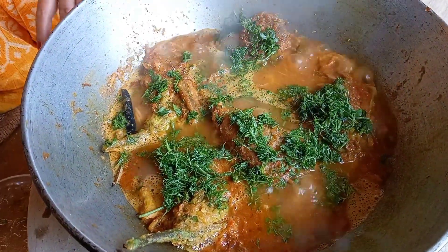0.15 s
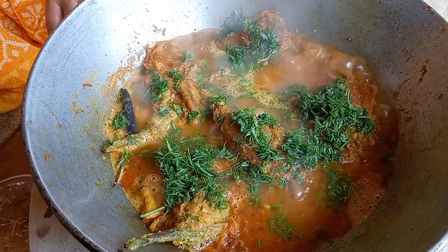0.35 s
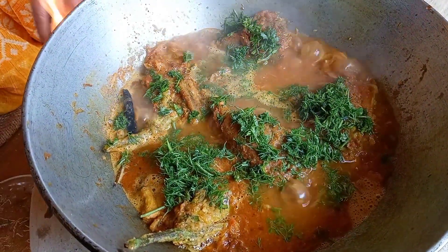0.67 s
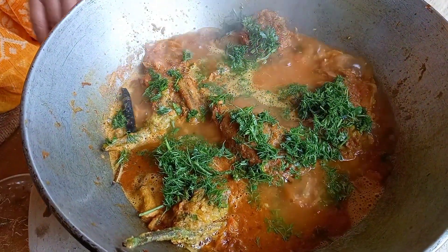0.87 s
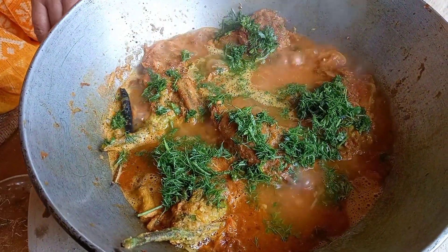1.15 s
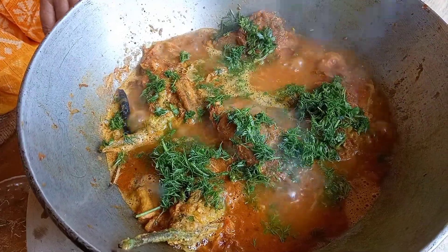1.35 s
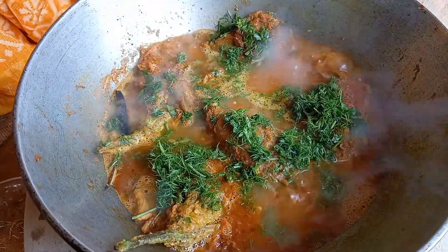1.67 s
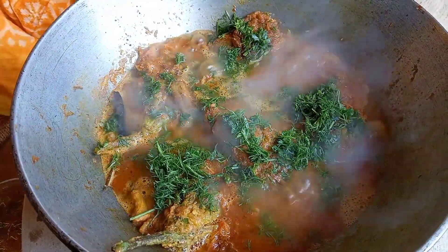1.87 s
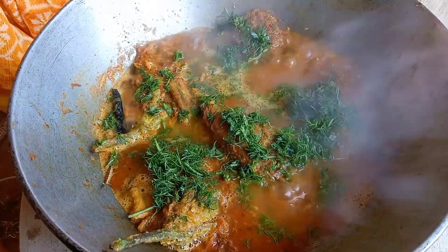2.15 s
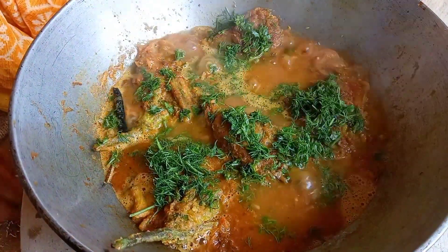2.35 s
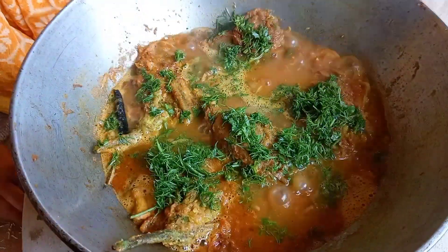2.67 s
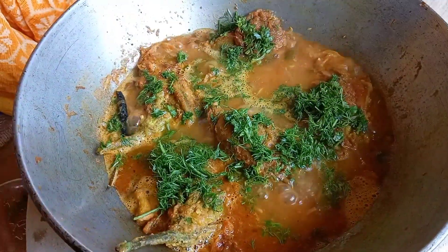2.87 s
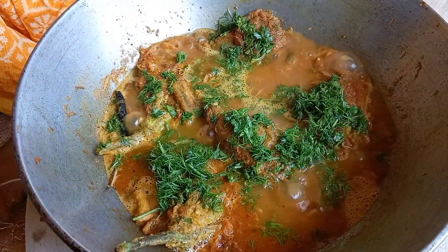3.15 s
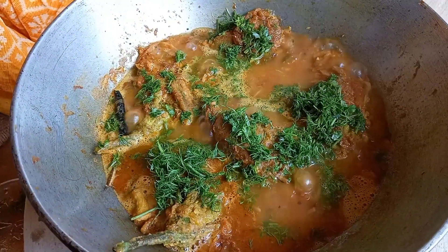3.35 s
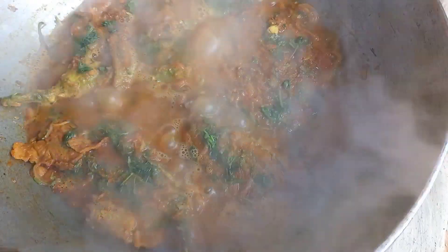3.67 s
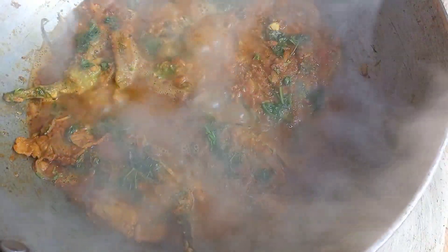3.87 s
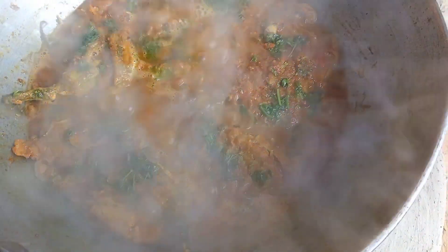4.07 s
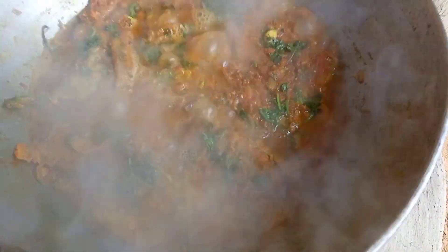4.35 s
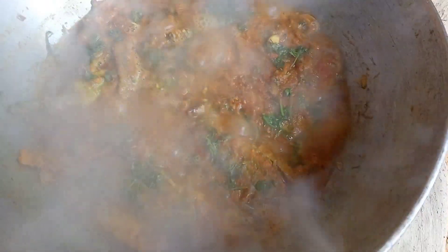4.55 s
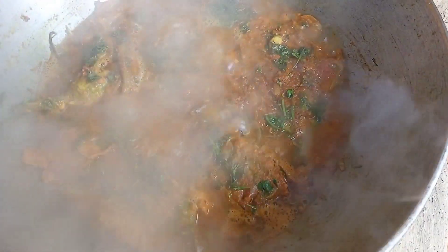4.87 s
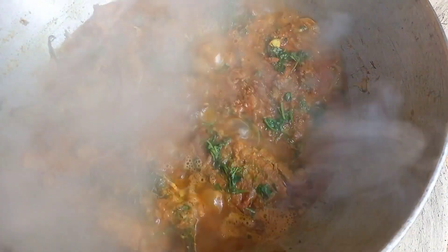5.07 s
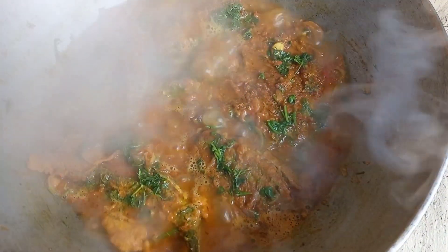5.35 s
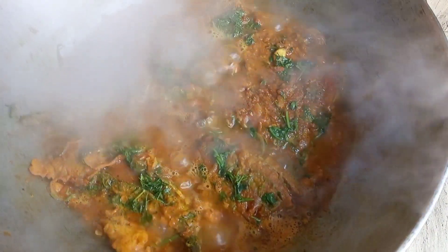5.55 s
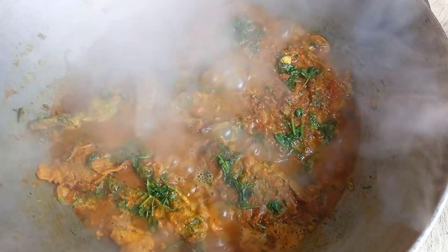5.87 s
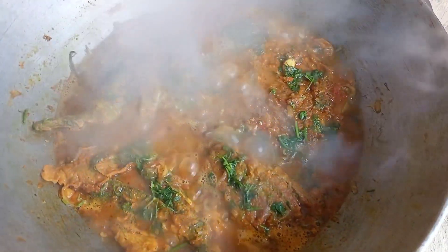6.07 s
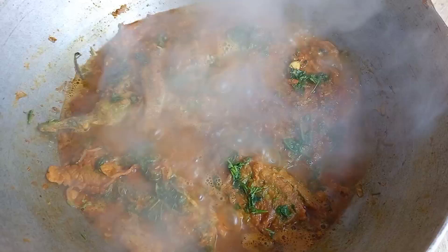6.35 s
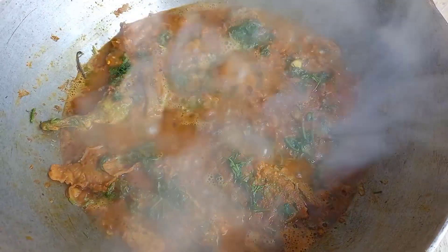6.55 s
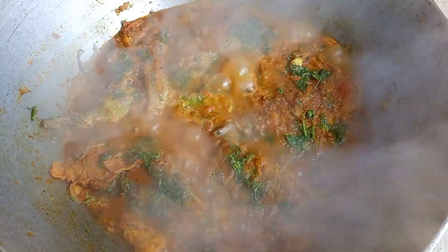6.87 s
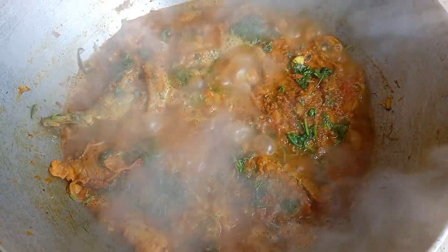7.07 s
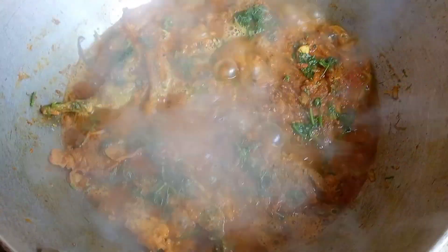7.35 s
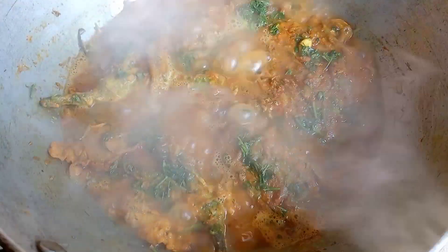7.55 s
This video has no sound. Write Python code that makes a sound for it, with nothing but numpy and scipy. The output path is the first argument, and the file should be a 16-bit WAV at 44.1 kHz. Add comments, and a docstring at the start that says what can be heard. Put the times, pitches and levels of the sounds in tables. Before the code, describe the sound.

Close over an open metal wok in an outdoor yard, thick sauce simmers from 0 seconds: irregular clusters of small wet bubbles, with larger short, hollow, ringing pops, notably at 0.16, 1.4 and 1.7. Sharp spits click around 0.4 and 1.4-1.5. Small birds whistle in gliding, fluttering, sometimes buzzy notes, with a falling call near 2.0, and become loud and busy from 2.9 to 3.7. Faint dull thumps come near 2.05, 2.3 and 3.05; a very loud one hits at 2.74. At 3.76 the scene cuts hard to a stronger boil, denser and lower, with steady plopping and frequent crackling spits. Faint sizzles flare at 4.6, 6.3 and 7.5; softer thumps fall at 5.4 and 6.1. Birds are sparse, returning around 5.5, 6.1, 6.8 and 7.35. Strong pops sound at 7.2 and 7.6. A low, uneven airy roar and faint hiss run throughout.

```python
"""Two scenes of curry in an open wok outdoors: it simmers, then after a hard cut at 3.76 s it boils.
Steam bubbles burst as short ringing pops, in clusters; sauce spits and hisses on the hot metal.
A few dull thumps are low tones that drop in pitch, and one of them is very loud.
Small birds whistle and buzz in gliding, fluttering tones, thrown back by the walls of a yard.
Coloured noise makes a low roar with a faint hiss behind it all."""
import sys
import numpy as np
from scipy import signal
from scipy.fft import rfft, irfft
from scipy.io import wavfile
from scipy.ndimage import uniform_filter1d

SR = 44100
rng = np.random.default_rng(int(sys.argv[2]) if len(sys.argv) > 2 else 0)


def file_out(sig):
    """Save sig as 16-bit WAV at sys.argv[1]."""
    # one column per channel
    cols = np.atleast_2d(sig).T
    # limit, then scale
    lim = np.clip(cols, -1, 1)
    pcm = np.round(lim * 32767).astype(np.int16)
    wavfile.write(sys.argv[1], SR, pcm)


N = 340011  # length in samples
CUT_S = 3.76  # the simmering scene ends and the boiling scene begins

# the largest bubbles: start_s, level_db (before the wok colours them), pitch_hz (at the start)
POPS = [(0.051, -22, 1390), (0.162, -12.5, 1450), (0.172, -21, 1870), (0.298, -24, 1100), (0.437, -23, 866),
        (0.48, -17, 1470), (0.576, -20, 2000), (1.048, -24, 1110), (1.359, -16, 1820), (1.539, -17, 2530),
        (1.666, -14.5, 1520), (1.936, -18, 1990), (2.286, -18, 1340), (2.723, -18, 1080),
        (2.775, -19.5, 2340), (2.851, -24, 1060), (2.887, -20.5, 1960), (3.141, -17, 1360),
        (3.211, -21.5, 2300), (3.435, -17, 1580), (3.605, -15, 1560), (3.681, -20.5, 1850),
        (3.842, -23, 1510), (3.889, -19, 2160), (3.902, -17, 1400), (4.055, -15, 2420), (4.113, -20, 1450),
        (4.18, -18.5, 1020), (4.244, -21.5, 940), (4.374, -17, 706), (4.409, -19, 1070), (4.425, -18, 1400),
        (4.526, -20.5, 800), (4.67, -20.5, 1740), (4.803, -16.5, 1550), (4.918, -17.5, 1100),
        (5.079, -22, 1560), (5.178, -16.5, 1160), (5.216, -18, 1620), (5.325, -19, 1830),
        (5.446, -18, 1110), (5.464, -16.5, 2070), (5.512, -16.5, 710), (5.542, -17.5, 610),
        (5.688, -17.5, 756), (5.713, -17, 1590), (5.782, -16, 1310), (5.876, -16.5, 1170),
        (5.914, -16.5, 1720), (5.983, -20, 970), (6.071, -19, 990), (6.242, -18.5, 910), (6.249, -19, 636),
        (6.454, -15, 1500), (6.469, -18.5, 576), (6.56, -21, 1020), (6.629, -19.5, 980), (6.723, -20, 900),
        (6.774, -18.5, 940), (6.971, -19.5, 940), (7.226, -10.5, 1450), (7.335, -18, 2220),
        (7.444, -20, 556), (7.593, -12.5, 1700)]
# Three bird calls that come back, one note per row: start_s (within the call), length_s,
# first_pitch_hz, last_pitch_hz, arch_hz (bulge of the glide), level_db (within the call),
# buzz_hz (strength of the pitch shaking)
FALL = [(0, .075, 5330, 5140, 30, -13, 45), (.06, .07, 5045, 5040, -20, -11, 35),
        (.075, .13, 4450, 4000, 30, -0.5, 84.7), (.185, .075, 3950, 3510, -2, 0.5, 400),
        (.27, .065, 3430, 3430, 14.5, -1.5, 40), (.34, .07, 3424, 3297, 21, -2, 110)]
RISE = [(0, .1, 2947, 3355, 60, -3.5, 200), (.085, .07, 3440, 4014, 40, 0.5, 230),
        (.135, .08, 4064, 4160, 30, -1, 55)]
CHIRP = [(0, .085, 3900, 4330, 252, -0.5, 380), (.06, 0.11, 3950, 3870, -57.5, -2, 190),
         (.01, .13, 5200, 5250, 150, -11.5, 390)]


def gain_of(db):
    """Turns decibels into a gain."""
    return 10 ** (np.asarray(db) / 20)


def evened(x):
    """Scales a sound to an average strength (rms) of 1."""
    return x / np.sqrt(np.mean(x ** 2) + 1e-20)


def add(mix, s, sound):
    """Mixes a sound in at s seconds, cutting off what runs past the end."""
    part = mix[max(0, round(s * SR)):][:len(sound)]
    part += sound[:len(part)]


def wander(size, rate_hz):
    """Smooth random drift of rms 1, made of noise with its changes faster than rate_hz weakened."""
    hz = np.fft.rfftfreq(size, 1 / SR)
    spectrum = rfft(rng.standard_normal(size))
    return evened(irfft(spectrum / (1 + (hz / rate_hz) ** 4), size))


def colour(x, points, size=4096):
    """Filters to the given spectrum without sounding ahead of time, so that clicks stay sharp."""
    f, db = np.transpose(points)
    hz = abs(np.fft.fftfreq(size, 1 / SR))
    log_gain = np.log(gain_of(np.interp(np.log(hz + 1), np.log(f), db)))
    # the Hilbert transform gives the phase that puts the energy earliest
    taps = np.fft.ifft(np.exp(np.conj(signal.hilbert(log_gain)))).real
    return signal.oaconvolve(x, taps[:size // 2])[:len(x)]


def echoes(x, first, t60, count):
    """Scattered reflections from first s on, losing 60 dB in t60 s; their total energy is 1."""
    delay = rng.uniform(0, t60, count)
    taps = np.zeros(int((first + t60) * SR) + 2)
    strength = rng.choice([-1, 1], count) * gain_of(-60 * delay / t60)
    np.add.at(taps, ((first + delay) * SR).astype(int), strength)
    return signal.oaconvolve(x, taps / np.linalg.norm(taps))[:len(x)]


def pop(hz, cycles, rise, size=900):
    """A bursting bubble: its cavity rings for a few cycles and rises in pitch as the hole widens."""
    turns = hz * np.arange(size) / SR
    age = turns / cycles
    opening = 1 - np.exp(-turns / .35)
    rising_turns = turns * (1 + rise * age / (1 + age))
    ring = opening * np.exp(-age) * np.sin(2 * np.pi * rising_turns)
    return ring / abs(ring).max()


def small_bubbles(per_s=1200, spread_db=4.0, cluster_db=2.0, size_cluster_db=0.65, cluster_hz=45,
                  simmer_db=-0.5, boil_db=0.0, count=32):
    """Bubbles burst in clusters, those of like size together; the wok colours them."""
    # colour of the small bubbles in the simmering scene: frequency_hz, level_db (per Hz, relative)
    simmer = [(60, -24.5), (200, -10), (420, 5.5), (750, 0.5), (1050, 2), (1330, -3.5), (1620, 1),
              (2300, 0), (3200, -1.5), (4800, -13.5), (6500, -34.5), (8500, -54.5), (11500, -42),
              (15000, -45.5)]
    # the same in the boiling scene: frequency_hz, level_db (per Hz, relative)
    boil = [(60, -12.5), (200, -8), (450, 2.5), (1050, 0), (1330, -9), (1650, -3), (2300, -4),
            (3100, -14.5), (4900, -16), (6500, -30.5), (8800, -56), (11500, -42), (13000, -48.5),
            (15500, -39)]
    t = np.arange(N) / SR
    foam = np.zeros(N)
    # four families of neighbouring pitches, each with its own activity
    for family in np.split(np.geomspace(200, 12000, count), 4):
        activity = gain_of(size_cluster_db * np.clip(wander(N, cluster_hz), -2, 2))
        for hz in family:
            at = rng.integers(0, N, int(per_s * N / SR / count))
            bursts = np.zeros(N)
            bursts[at] = gain_of(spread_db * np.minimum(rng.exponential(1, len(at)), 4))
            # middle-sized bubbles ring longest; big ones are damped by the thick sauce
            cycles = rng.uniform(.5, 1.3) * (1 + 1.8 * np.exp(-2 * np.log(hz / 1700) ** 2))
            ring = pop(hz, cycles, rise=0.053)
            ring /= np.linalg.norm(ring)
            foam += signal.oaconvolve(bursts * activity, ring)[:N] * np.sqrt(hz)
    foam *= gain_of(cluster_db * np.clip(wander(N, cluster_hz), -2, 2))
    foam += 0.36 * echoes(foam, first=0.001193, t60=.03, count=40)
    out = np.zeros(N)
    simmering = t < CUT_S
    for points, db, when in ((simmer, simmer_db, simmering), (boil, boil_db, ~simmering)):
        sound = colour(foam, points)
        # steam escapes at an even pace, so clusters share out a steady power
        power = abs(uniform_filter1d(sound ** 2, size=3500))
        sound /= np.sqrt(power + 1e-12)
        out += sound * gain_of(db) * when
    return out * steam(t)


def steam(t, stir_db=-19.5, stir_half_length_s=.02):
    """Gain of the small bubbles: steady heat, a swell for each gulp, a brief one round each large pop."""
    # how hard the sauce bubbles between gulps: time_s, level_db (relative)
    heat = [(0, -42), (1.3, -42.5), (2.5, -40), (3.7, -42.5), (3.82, -38.5), (4.0, -43), (4.2, -41),
            (5.2, -42), (6.0, -40), (7.7, -40.5)]
    # gulps of steam that set off small bubbles: middle_s, half_length_s, level_db (relative)
    gulps = [(0.014, 0.09, -35), (0.167, .025, -33), (0.293, 0.033, -33), (.407, .02, -34.5),
             (.435, .015, -33), (0.496, .03, -35), (0.566, 0.039, -36), (.73, 0.075, -35),
             (0.868, 0.084, -39), (.95, .04, -35.5), (1.041, 0.033, -30.5), (1.149, 0.044, -37),
             (1.26, 0.035, -35.5), (1.375, .03, -29.5), (1.543, 0.044, -35), (1.66, 0.033, -35.5),
             (2.453, 0.055, -37.5), (2.731, 0.018, -29.5), (3.2, 0.073, -36.5), (3.316, 0.021, -30.5),
             (3.467, .06, -35.5), (3.611, .02, -34), (3.903, .025, -36.5), (4.085, 0.06, -33.5),
             (4.265, .035, -36.5), (4.33, 0.06, -36), (4.425, 0.055, -35.5), (4.544, .035, -34),
             (4.665, 0.11, -38.5), (4.853, 0.065, -37), (5.047, 0.052, -37.5), (5.145, .04, -37),
             (5.331, 0.031, -32), (5.455, 0.022, -34.5), (5.516, 0.019, -33), (5.692, 0.046, -34),
             (6.008, 0.044, -38), (6.241, .025, -30.5), (6.338, 0.063, -36.5), (6.422, 0.021, -36.5),
             (6.483, 0.041, -32), (6.614, .04, -33), (6.762, 0.02, -35.5), (6.958, 0.052, -34),
             (7.09, 0.13, -38), (7.236, 0.018, -31), (7.384, 0.03, -38), (7.45, 0.031, -33.5),
             (7.582, 0.047, -34), (7.647, 0.026, -32)]
    power = gain_of(np.interp(t, *np.transpose(heat))) ** 2
    stirs = [(s, stir_half_length_s, db + stir_db) for s, db, hz in POPS]
    for middle, half_length, db in gulps + stirs:
        swell = signal.windows.hann(int(2 * half_length * SR)) ** 2
        start = middle - half_length
        # a swell that begins before time 0 loses its first part
        add(power, start, gain_of(db) ** 2 * swell[max(0, round(-start * SR)):])
    return np.sqrt(power)


def large_bubbles(level_db=-1.0, splash=0.19, neighbour_db=-12, neighbour_s=.009, count=3):
    """Each large pop sets off a few smaller neighbours; the steep metal sides scatter and colour them."""
    # how the hollow of the wok colours a large pop: frequency_hz, gain_db
    wok = [(100, -2), (350, 3), (550, -5.5), (1050, -1.5), (1350, -12.5), (1650, -1), (2300, -0.5),
           (3200, -1), (5000, -8), (7000, -23), (10000, -31.5)]
    out = np.zeros(N)
    for s, db, hz in POPS + middling_pops():
        cycles = rng.uniform(.7, 1.1) * (.5 + hz / 1400)
        ring = pop(hz, cycles, rise=0.042)
        scattered = splash * echoes(ring, first=0.000932, t60=.025, count=14)
        add(out, s, gain_of(db + level_db) * (ring + scattered))
        for when, size, pitch in rng.standard_normal((count, 3)):
            near_hz = np.clip(hz * np.exp(.4 * pitch), 350, 2600)
            blip = pop(near_hz, cycles=.5 + near_hz / 1100, rise=0.054)
            add(out, s + neighbour_s * abs(when), gain_of(db + neighbour_db + 1.2 * size) * blip)
    return colour(out, wok)


def middling_pops(per_s=9, typical_db=-25, typical_hz=947, spread_db=2.0, pitch_spread=0.34, count=200):
    """Rows like those of POPS for middling bubbles, falling at random through the boiling scene."""
    times = CUT_S + np.cumsum(rng.exponential(1 / per_s, count))
    sizes, pitches = np.clip(rng.standard_normal((2, count)), -2, 2)
    levels = typical_db + spread_db * sizes
    rows = zip(times, levels, typical_hz * np.exp(pitch_spread * pitches))
    return [row for row in rows if row[0] < N / SR]


def spits(spray=0.094, spray_s=0.0031, size=2048):
    """A film of sauce snaps, then fine spray crackles on the metal."""
    # sharp spits of sauce: start_s, level_db (peak), lift_db (of the fizz above 6 kHz)
    spit_list = [(0.41, -21, 0), (0.4306, -17, -17), (1.36, -20, -11), (1.5486, -17.5, -1),
                 (2.8542, -18, -5), (4.0536, -19.5, -11), (4.112, -18, -25), (4.263, -21, -2),
                 (4.525, -21, 9), (4.564, -20, 9), (4.662, -21, 14), (4.903, -31, 23), (5.178, -20, 3),
                 (5.465, -27, 6), (5.513, -14.5, 0), (5.8454, -19.5, 15), (6.023, -30, 18),
                 (6.412, -24.5, 7), (6.454, -18, 5), (6.6474, -17.5, 13.5), (6.759, -19, -7),
                 (6.773, -16.5, -4), (7.298, -19.5, 0), (7.5905, -14, -19)]
    # colour of a spit's snap: frequency_hz, level_db (per Hz, relative)
    snap_colour = [(100, -1), (500, 1.5), (2200, -1), (4200, 6), (5300, 0), (6500, -18.5), (8500, -40.5),
                   (11500, -35.5), (15000, -63)]
    out, t = np.zeros(N), np.arange(size) / SR
    for s, db, lift_db in spit_list:
        snap = spray * rng.standard_normal(size) * np.exp(-t / spray_s)
        snap[0] = 1  # the snap itself is a single click
        points = [(hz, level + lift_db * (hz > 6000)) for hz, level in snap_colour]
        sound = colour(snap, points)
        add(out, s, gain_of(db) * sound / abs(sound).max())
    return out


def sizzles(centre_hz=6400, width_hz=1700, crackle_db=4):
    """Sauce slops onto the hot dry side of the wok and hisses away, as crackling noise in a band."""
    # sauce hissing on the hot side: start_s, length_s, level_db (before the band filter)
    sizzle_list = [(4.593, 0.15, -48), (6.27, 0.16, -48), (7.54, 0.18, -49)]
    out = np.zeros(N)
    for s, length, db in sizzle_list:
        t = np.arange(int(length * SR)) / SR
        crackle = gain_of(crackle_db * wander(len(t), 400))
        hiss = evened(rng.standard_normal(len(t)) * crackle)
        swell = np.sin(np.pi * np.sqrt(t / length)) ** 2  # rises fast, fades slowly
        add(out, s, gain_of(db) * hiss * swell)
    band = [centre_hz - width_hz / 2, centre_hz + width_hz / 2]
    return signal.sosfilt(signal.butter(3, band, "band", fs=SR, output="sos"), out)


def thumps(sweep=2.6, sweep_s=0.0023, decay_s=0.0065, rise_s=0.00082, size=3500):
    """A low blow whose pitch drops at once and dies in a few cycles."""
    # dull thumps: start_s, level_db (before the rise and decay), pitch_hz (after the drop)
    thump_list = [(2.051, -29.5, 69), (2.31, -28, 85), (2.7364, 2.1, 107), (3.05, -27.5, 77),
                  (5.382, -18.5, 111), (6.13, -25, 128)]
    out, t = np.zeros(N), np.arange(size) / SR
    for s, db, hz in thump_list:
        turns = np.cumsum(hz * (1 + sweep * np.exp(-t / sweep_s))) / SR
        envelope = (1 - np.exp(-t / rise_s)) * np.exp(-t / decay_s)
        add(out, s, gain_of(db) * envelope * np.sin(2 * np.pi * turns))
    return out


def birds(level_db=-2.5, near_db=-8, yard_db=-10.0):
    """All bird notes, with quick reflections from near walls and the longer ring of the yard."""
    # when the returning calls are sung: call, start_s, level_db (relative)
    figures = [(CHIRP, 1.165, -34), (FALL, 1.968, -26), (RISE, 2.53, -26.5), (CHIRP, 6.128, -35),
               (FALL, 6.815, -28), (RISE, 7.352, -29.5)]
    # notes sung only once: start_s, length_s, first_pitch_hz, last_pitch_hz, arch_hz,
    # level_db (relative), buzz_hz
    single_notes = [(0, 0.097, 2330, 2620, 43.5, -38, 60), (.11, 0.048, 4450, 4630, 42, -45.5, 100),
                    (.15, 0.12, 2730, 2910, -2, -42, 100), (.225, 0.077, 3070, 4100, 80, -31.5, 190),
                    (.29, 0.11, 4200, 5430, 151, -48.5, 280), (.42, 0.41, 3720, 3280, -30, -37.5, 446.5),
                    (0.759, 0.073, 2970, 2950, -1, -37, 179.6), (0.871, 0.067, 3660, 3350, 0, -33.5, 160.7),
                    (0.909, 0.24, 2882, 2750, -130, -39.5, 130), (.94, 0.12, 4520, 5240, 99, -52, 140),
                    (1.07, .06, 4530, 5470, 100, -54, 120), (1.415, .06, 3190, 2860, 0, -40, 80),
                    (1.51, 0.098, 2810, 3460, 2, -37.5, 160), (1.59, .21, 3420, 3156, -0.5, -32.5, 210),
                    (1.841, 0.092, 5070, 4100, 243, -44.5, 40), (1.905, .095, 4350, 2850, -150, -33.5, 40),
                    (2.23, 0.15, 4900, 4770, -2, -41.5, 300), (2.35, .09, 3150, 3310, -49.5, -33, 450),
                    (2.43, .13, 3306, 3045, -100, -33, 721), (2.715, 0.091, 2266, 2600, 43, -34, 60),
                    (2.73, 0.084, 4050, 4080, 0, -34, 40), (2.825, 0.07, 4270, 2880, 0, -35, 350),
                    (2.88, 0.093, 3786, 3874, 21, -29.5, 35), (2.895, .08, 4860, 4790, -41, -29.5, 45.1),
                    (2.96, 0.13, 3480, 3820, 45, -32, 250), (2.97, 0.2, 4950, 4550, -100, -41, 240),
                    (3.05, 0.074, 3836, 3960, -1, -24.5, 110), (3.145, 0.078, 4480, 4120, 67, -30.5, 149),
                    (3.19, 0.093, 3587, 3145, -100, -24.5, 800), (3.28, 0.092, 3210, 3400, 2, -35, 850),
                    (3.35, 0.035, 3865, 3904, 1, -26.5, 80), (3.37, .05, 3045, 3205, 1, -30, 350),
                    (3.38, .1, 4860, 5530, 0, -42, 170), (3.4, 0.0776, 3244, 3428, 39, -20.5, 110),
                    (3.47, 0.14, 5750, 5720, 250, -55, 120), (3.59, .13, 4775, 4350, -120, -31.5, 150),
                    (3.59, 0.16, 5420, 4990, -2, -44, 432), (3.715, 0.048, 4260, 3450, -5, -29.5, 476),
                    (5.43, 0.06, 3840, 4090, 100, -39.5, 190), (5.505, 0.053, 4910, 5020, -30, -41, 60),
                    (5.513, 0.022, 3820, 3710, -1, -32, 30), (6.449, 0.087, 2710, 2480, -27, -43, 55)]
    song, out = np.zeros(N), np.zeros(N)
    for figure, start, db in figures:
        for s, *shape in figure:
            add(song, start + s, gain_of(db) * note(*shape))
    for s, *shape in single_notes:
        add(song, s, note(*shape))
    second_scene = np.arange(N) / SR >= CUT_S
    # each scene has its own echoes, and those of the first break off at the cut
    for when in (~second_scene, second_scene):
        near = gain_of(near_db) * echoes(song * when, first=0.0015, t60=.075, count=30)
        yard = gain_of(yard_db) * echoes(song * when, first=.02, t60=.6, count=500)
        out += (song + near + yard) * when
    return gain_of(level_db) * out


def note(length, first_hz, last_hz, arch_hz, db, buzz, buzz_hz=125, rasp_hz=150, swing=0.86, jitter=0.27,
         throb=0.064, shimmer_db=3.0, second_db=-58, third_db=-54, attack=0.2, release=0.32):
    """An arched whistle shaken in pitch by a flutter; wide swings run faster and turn into a harsh rasp."""
    t = np.arange(0, length, 1 / SR)
    u = t / length
    hz = first_hz + (last_hz - first_hz) * u + arch_hz * np.sin(np.pi * u)
    # attack and release are shares of the note's length
    fade = np.clip(np.minimum(u / attack, (1 - u) / release), 0, 1)
    envelope = np.sin(np.pi / 2 * fade)
    harsh = np.clip(buzz / 800, 0, 1)
    unsteady = 1 + 0.11 * wander(SR, 40)[:len(t)]
    flutter_hz = (buzz_hz + rasp_hz * harsh ** 2) * unsteady
    flutter = np.sin(2 * np.pi * np.cumsum(flutter_hz) / SR)
    roughness = jitter * np.sqrt(harsh) * wander(SR, 900)[:len(t)]
    shaken_hz = hz + buzz * (swing * harsh ** 0.082 * flutter + roughness)
    phase = 2 * np.pi * np.cumsum(shaken_hz) / SR
    shimmer = gain_of(shimmer_db * wander(SR, 92)[:len(t)])
    pressure = (1 + throb * np.sqrt(harsh) * flutter) * shimmer
    overtones = gain_of(second_db) * np.sin(2 * phase) + gain_of(third_db) * np.sin(3 * phase)
    tone = np.sin(phase) + overtones
    return gain_of(db) * evened(pressure * tone) * envelope


def air(level_db=-46, swell_db=2.2):
    """A lumpy low roar with a faint hiss: noise that swells at random, then is coloured."""
    # colour of the roar and hiss: frequency_hz, level_db (per Hz, relative)
    air_colour = [(20, -32.5), (40, -12.5), (70, -4), (120, 1.5), (200, -7.5), (400, -16.5), (1000, -17),
                  (3500, -23), (5000, -25), (6500, -42.5), (8500, -53), (11300, -50), (12800, -63),
                  (15500, -61.5)]
    noise = rng.standard_normal(N) * gain_of(swell_db * wander(N, 15))
    return gain_of(level_db) * evened(colour(noise, air_colour))


def scene():
    """The wok, the birds and the air, in one channel."""
    wok_sound = small_bubbles() + large_bubbles() + spits() + sizzles() + thumps()
    return (wok_sound + birds() + air())[None]


def record(dry, bass_cut_hz=48, edge_hz=15700):
    """The microphone loses the deepest bass; then a steep filter removes the treble above edge_hz."""
    dry = signal.sosfilt(signal.butter(2, bass_cut_hz, "high", fs=SR, output="sos"), dry)
    low_pass = signal.firwin(511, edge_hz, window=("kaiser", 9), fs=SR)
    return signal.oaconvolve(dry, low_pass[None], "same")


dry = scene()
out = record(dry)
file_out(out)
```